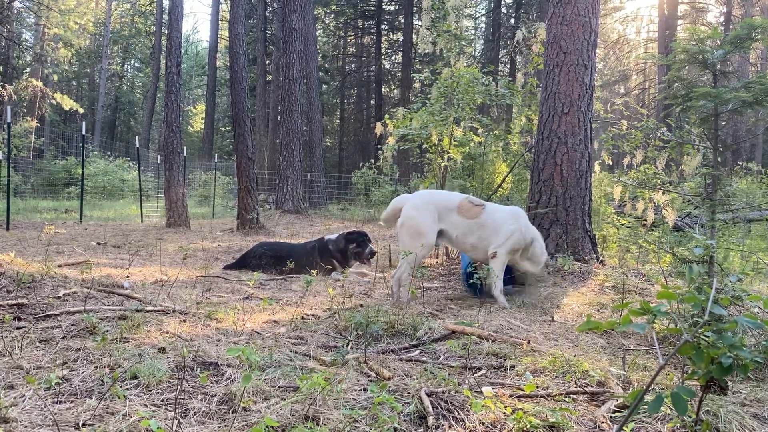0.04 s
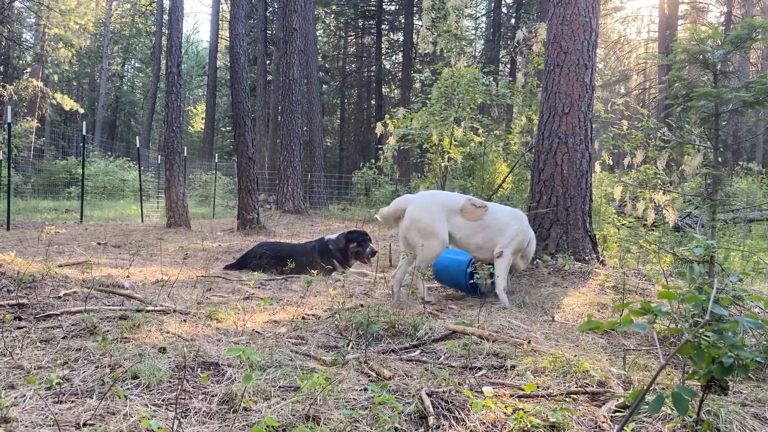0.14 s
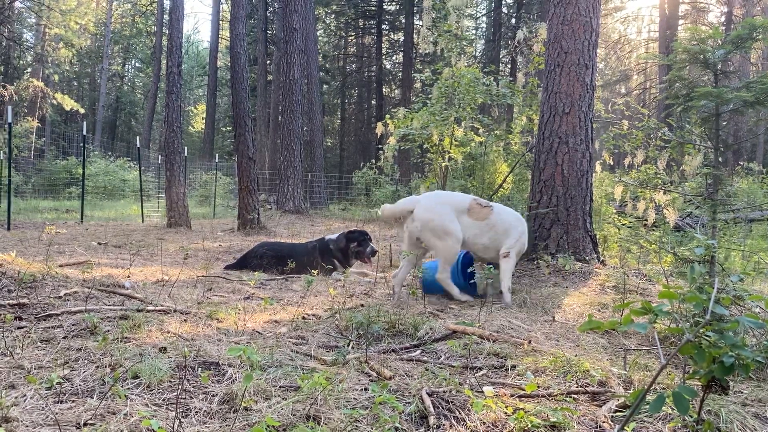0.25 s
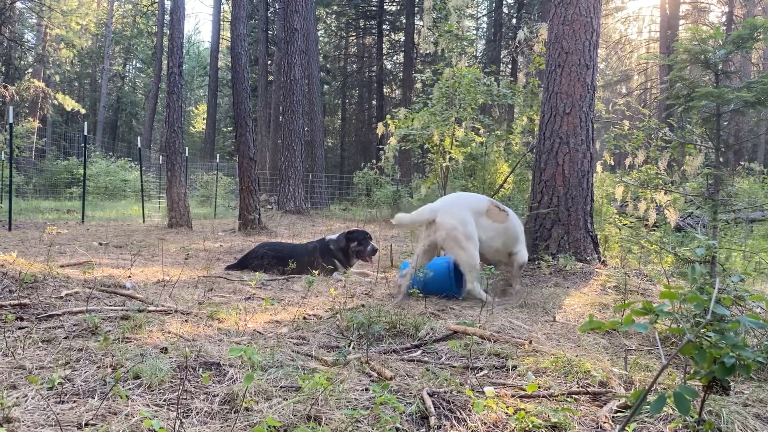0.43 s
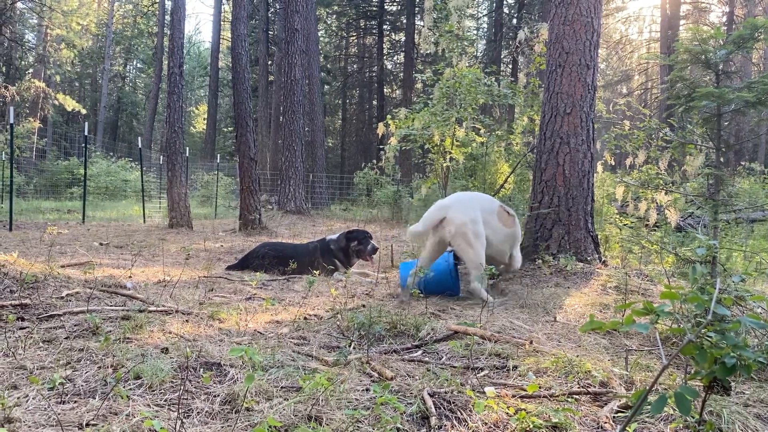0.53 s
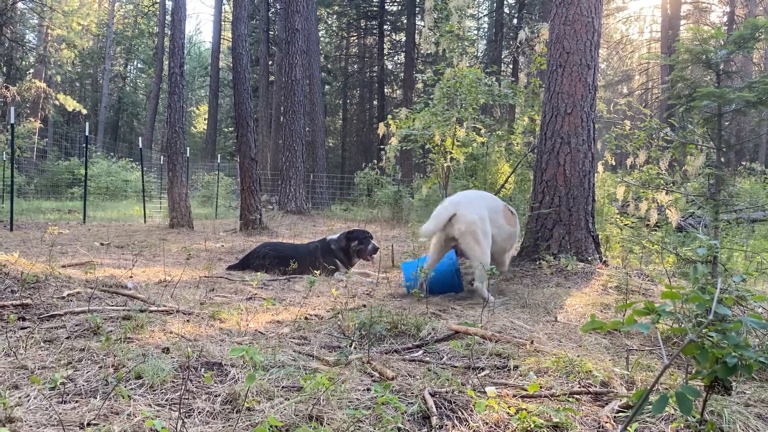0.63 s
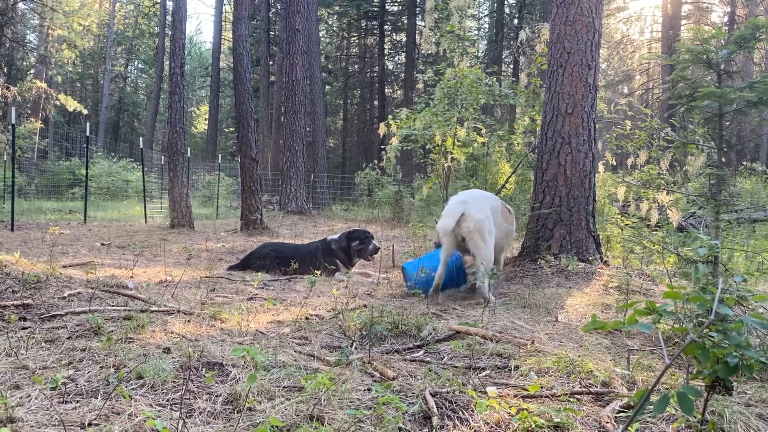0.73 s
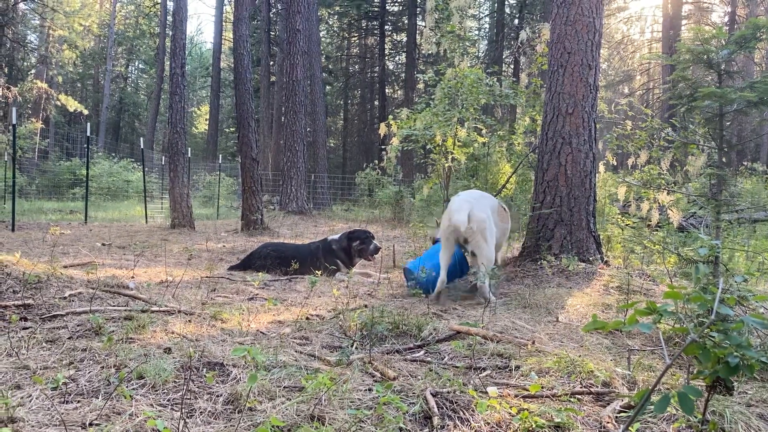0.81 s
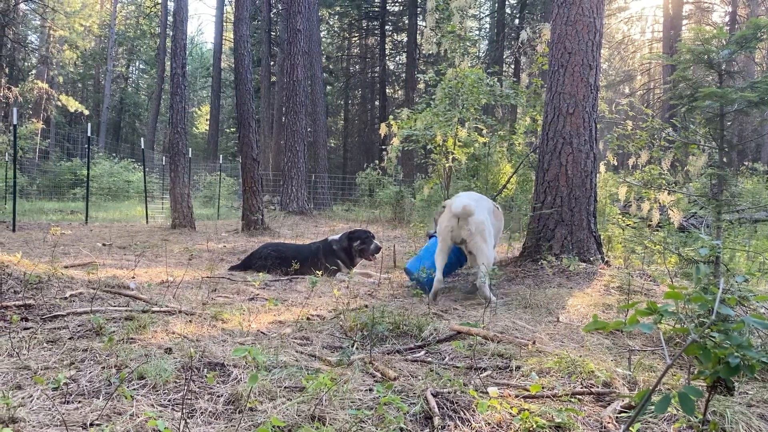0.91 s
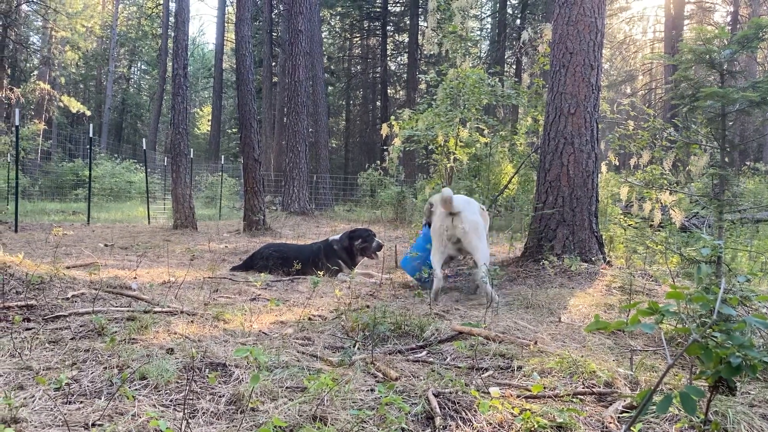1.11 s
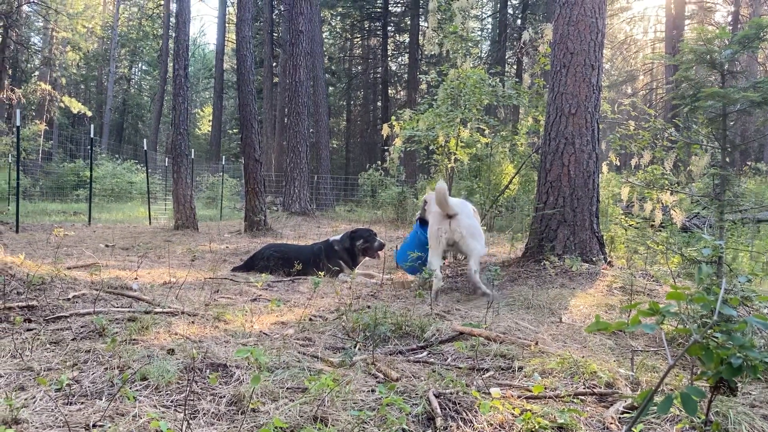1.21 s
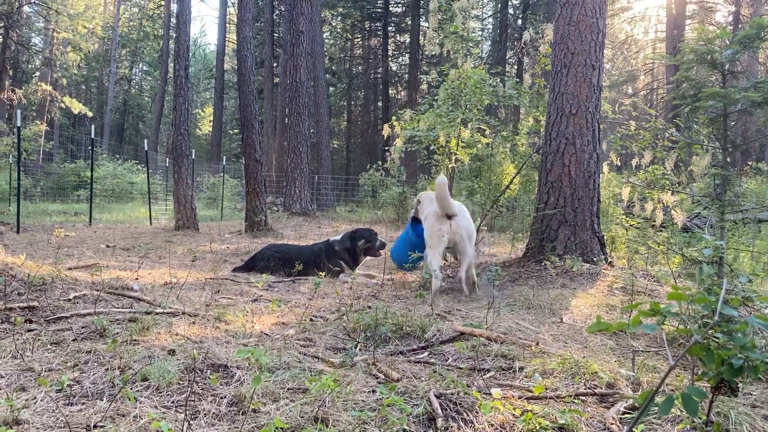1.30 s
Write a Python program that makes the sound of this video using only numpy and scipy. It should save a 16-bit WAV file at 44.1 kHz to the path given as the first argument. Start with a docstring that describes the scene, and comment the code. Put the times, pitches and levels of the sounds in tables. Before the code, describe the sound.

A plastic bucket booms hollowly and clacks as a dog shoves it, then scrapes along the soil in short, softer pushes. Paws scuff dry needles and twigs snap, a few metres from the microphone in a quiet wood.

```python
"""A plastic bucket, shoved by a dog over the needle-covered floor of a wood, a few metres from the mic.
Knocked, the hollow bucket booms; its rim judders, clacks and grinds on the soil and sets the wall ringing.
Around it paws scuff the dry litter and twigs snap. The trunks return a thin echo over a low hush of air.
The stereo microphone's two ports hear the scene with slightly different colour and timing."""
import sys
import numpy as np
from scipy import signal
from scipy.fft import rfft, irfft
from scipy.io import wavfile

SR = 44100
rng = np.random.default_rng(int(sys.argv[2]) if len(sys.argv) > 2 else 0)


def master_out(mix):
    """Clip the mix to full scale and print it as 16-bit PCM to the path in sys.argv[1]."""
    frames = np.transpose(np.atleast_2d(mix))
    ceiling = np.clip(frames, -1, 1)
    pcm = np.round(ceiling * 32767).astype(np.int16)
    wavfile.write(sys.argv[1], SR, pcm)


N = 59535

# knocks on the bucket: t/s, lowest mode f/Hz, boom level/dB, overtone level/dB, overtone rise/s, free ring/s
BUCKET_KNOCKS = [(0.086, 92.2, -43.5, -45.5, 0.01, 0.062), (0.175, 99, -36.5, -41, 0.011, 0.035),
                 (0.1946, 95.1, -24, -31.5, 0.018, 0.074), (0.269, 97.66, -25.5, -20, 0.005, 0.18),
                 (0.36, 101.4, -54, -37, 0.0034, 0.028), (0.408, 102.3, -66, -32.5, 0.0062, 0.05),
                 (0.814, 96.95, -33, -31, 0.015, 0.15), (1.024, 97.4, -72, -51.5, 0.002, 0.0097),
                 (1.115, 96.3, -75, -46.5, 0.0037, 0.06), (1.176, 99.9, -75, -41.5, 0.0066, 0.1)]
# overtones of the bucket: multiple of the lowest mode, level/dB, t60/s
BUCKET_OVERTONES = [(2.0, -5, 0.26), (1.9, -2, 0.033), (2.15, -5, 0.08), (2.6, -11, 0.11),
                    (3.15, -14, 0.04), (4.12, -15.5, 0.24), (4.88, -24, 0.23)]
# shoves along the ground: t/s, rise/s, hold/s, decay/s, rumble level/dB, grind level/dB, rattle level/dB
BUCKET_SHOVES = [(0.067, 0.014, 0.014, 0.011, -63, -43.5, -43.5),
                 (0.111, 0.015, 0.0068, 0.013, -59, -48, -70),
                 (0.173, 0.012, 0.013, 0.01, -47.5, -42, -38.5),
                 (0.198, 0.0062, 0.042, 0.0095, -44.5, -34.5, -32),
                 (0.252, 0.0051, 0.014, 0.033, -36, -36.5, -36.5),
                 (0.347, 0.0093, 0.1, 0.037, -69, -50, -48.5),
                 (0.414, 0.011, 0.011, 0.023, -49.5, -46, -44),
                 (0.45, 0.0084, 0.0074, 0.023, -45, -43, -41),
                 (0.488, 0.0069, 0.047, 0.22, -57, -60.5, -60.5),
                 (0.588, 0.0058, 0.0026, 0.0093, -52.5, -46, -43),
                 (0.659, 0.0077, 0.013, 0.0045, -51.5, -47.5, -48.5),
                 (0.675, 0.026, 0.016, 0.07, -56, -65, -60),
                 (0.797, 0.008, 0.056, 0.029, -52.5, -51, -59.5),
                 (0.879, 0.018, 0.034, 0.0071, -56, -49, -53.5), (1.02, 0.0081, 0.12, 0.022, -56, -53, -56),
                 (1.103, 0.012, 0.04, 0.091, -48.5, -45, -55),
                 (1.155, 0.0053, 0.031, 0.033, -68, -44.5, -50.5)]
# spectra of the hollow's rumble, the rim's grinding and the wall's rattle: f/Hz, level/dB
RUMBLE_SPECTRUM = [(25, -51), (60, 2.5), (125, -8), (200, 2), (300, -2.5), (450, -2.5), (650, -21.5),
                   (2000, -50)]
GRIND_SPECTRUM = [(100, -38), (450, 13), (640, -22), (800, -1.5), (1050, 8.5), (1400, -1), (1700, 11.5),
                  (3000, -3), (15000, -22)]
RATTLE_SPECTRUM = [(100, -85), (1400, -6), (1850, 8), (2250, 11.5), (2500, 4.5), (2850, 8.5), (3400, -13.5),
                   (4100, -4.5), (5300, -23), (15000, -46.5)]
# modes of the plastic wall: f/Hz, level/dB, t60/s
LOW_WALL_MODES = [(798, -4.5, 0.23), (985, -7, 0.092), (1020, -2, 0.065), (1125, -0.5, 0.034),
                  (1261, -3, 0.041), (1348.5, 3.5, 0.028), (1457, -6, 0.043)]
HIGH_WALL_MODES = [(1850, -14, 0.09), (2188, 4.5, 0.06), (2319, 1, 0.097), (2840, -13, 0.066),
                   (2585, 1, 0.17), (2940, 4, 0.14), (4020, -17, 0.3)]
# clacks of the rim on hard ground: t/s, level/dB, centre f/Hz
RIM_CLACKS = [(0.081, -35, 1173), (0.2165, -27, 2360), (0.2385, -30.5, 1196), (0.27, -27.5, 1350),
              (0.456, -44, 990), (0.464, -40.5, 2400), (1.177, -35.5, 1005)]
# paw scuffs: t/s, level/dB, rise/s, decay/s, treble tilt/(dB per octave)
PAW_SCUFFS = [(0.032, -51, 0.001, 0.048, 3.5), (0.161, -42.5, 0.0017, 0.0082, 6.5),
              (0.709, -47.5, 0.0017, 0.014, 7), (0.772, -44, 0.0049, 0.0071, 6)]
# spectrum of litter crushed underfoot: f/Hz, level/dB
SCUFF_SPECTRUM = [(60, 21), (300, -7), (600, -10), (1000, 8), (1600, 9), (2400, 5), (4000, -6.5),
                  (5300, -14), (8000, -23), (15000, -53)]
# twig snaps: t/s, level/dB, centre f/Hz
TWIG_SNAPS = [(0.426, -32, 2200), (0.448, -39, 2700), (0.711, -46, 3900), (0.8485, -35.5, 2900),
              (0.853, -38, 2400), (0.987, -51, 7500), (1.039, -45, 4500), (1.1675, -35, 3200)]
# rustle of dry needles, one list a stride: t/s, level/dB
NEEDLE_STRIDES = [
    [(0.0, -69), (0.242, -77), (0.336, -67), (0.426, -59.5), (0.6, -77)],
    [(0.6, -75), (0.664, -61), (0.982, -71.5), (0.986, -57.5), (1.015, -107)],
    [(1.015, -107), (1.025, -62), (1.111, -67.5), (1.131, -63), (1.35, -63)],
]
# spectrum of that rustle: f/Hz, level/dB
NEEDLE_SPECTRUM = [(60, -3), (600, -6), (1100, 2), (2500, 2), (4000, 1.5), (5300, -1), (7000, 3),
                   (10500, 1.5), (15500, -4.5)]
# colour of the echo off the trunks: f/Hz, gain/dB
ECHO_COLOUR = [(50, -37), (250, -7.5), (800, -1), (8000, 2.5), (15000, -35)]
# spectrum of the still air in the wood: f/Hz, level/dB
AIR_SPECTRUM = [(20, -44), (50, -10), (90, -1.5), (140, -12), (220, -22), (600, -30), (1100, -20.5),
                (2500, -24.5), (5000, -32), (15000, -38)]
# balance of the microphone ports: f/Hz, left minus right/dB
PORT_BALANCE = [(100, -1.5), (350, 0.5), (1290, -1.5), (2380, -8), (4400, -3), (8000, -5.5), (15000, 3.5)]

BOOM_T60_S, BOOM_RISE_S, DAMP_S = 0.63, 0.021, 0.013
JUDDER_DEPTH, JUDDER_KNEE_DB = 0.6, -24  # the judder nears full depth once the boom passes the knee
BUMP_DB = 24.5  # the bump at the bite of a shove, over its slips
GRIND_DB, RATTLE_DB, LOW_RING_GAIN, HIGH_RING_GAIN = -5, -4, 0.81, 0.28
WALL_CUT_HZ = 858  # the wall radiates little below this
CLACK_OCTAVES, CLACK_RISE_S = 0.09, 0.0023
SNAP_DECAY_S, SNAP_DB_PER_OCTAVE = 0.0021, 13
NEEDLE_DB, NEEDLE_WIDTH = 3, 0.58
ECHO_DB, ECHO_T60_S, ECHO_ONSET_S = -7.5, 0.27, 0.0024
AIR_DB, AIR_WIDTH = -60, 0.4
LEFT_LEAD_S, LOW_CUT_HZ, HIGH_CUT_HZ = 22e-6, 35, 15900


def bucket_knock(start, hz, boom_db, overtone_db, rise, free_ring):
    """The hollow bucket booms until ground or muzzle damps it."""
    t = np.maximum(times() - start, 0)
    boom = ringing(t, [(hz, boom_db, BOOM_T60_S)]) * swell(t, BOOM_RISE_S)
    modes = [(ratio * hz, db + overtone_db, t60) for ratio, db, t60 in BUCKET_OVERTONES]
    overtones = ringing(t, modes) * swell(t, rise)
    damping = np.exp(-(np.maximum(t - free_ring, 0) / DAMP_S) ** 2)
    return (boom + overtones) * damping


def rim_scrape(boom):
    """At each shove the rim bumps, then sticks and slips on grit, juddering with the boom."""
    t = times()
    power, bumps = np.zeros((3, N)), np.zeros((3, N))  # rows: rumble, grind, rattle
    for start, rise, hold, decay, *levels_db in BUCKET_SHOVES:
        push = swell(t - start, rise) * np.exp(-np.maximum(t - start - rise - hold, 0) / decay)
        power += np.outer(amp(levels_db), push) ** 2
        bumps[:, round((start + rise) * SR)] += amp(BUMP_DB) * amp(levels_db)
    swing = boom / (abs(signal.hilbert(boom)) + amp(JUDDER_KNEE_DB))
    slips = grains(per_s=4000, spread_db=2) * (1 + JUDDER_DEPTH * swing)
    rumble, grind, rattle = np.sqrt(power) * slips
    _, low_bumps, high_bumps = bumps
    low = body(grind, GRIND_SPECTRUM) + LOW_RING_GAIN * wall(grind + low_bumps, LOW_WALL_MODES)
    high = body(rattle, RATTLE_SPECTRUM) + HIGH_RING_GAIN * wall(rattle + high_bumps, HIGH_WALL_MODES)
    return body(rumble, RUMBLE_SPECTRUM) + amp(GRIND_DB) * low + amp(RATTLE_DB) * high


def rim_clack(start, db, centre_hz):
    """The rim strikes hard ground; the point of contact picks which wall modes ring."""
    t = np.maximum(times() - start, 0)
    modes = []
    for hz, mode_db, t60 in LOW_WALL_MODES + HIGH_WALL_MODES:
        detuning = np.log2(hz / centre_hz) / CLACK_OCTAVES
        modes.append((hz, mode_db - 20 * np.log10(1 + detuning ** 2), t60))
    ring = ringing(t, modes) * swell(t, CLACK_RISE_S)
    return amp(db) * ring / abs(ring).max()


def body(drive, spectrum):
    """The bucket's broad resonances colour the slips of the rim."""
    return through(drive, coloured(signal.unit_impulse(N), spectrum))


def wall(drive, modes):
    """The thin plastic wall rings in its modes, radiating little bass."""
    low_cut = signal.butter(4, WALL_CUT_HZ, "highpass", fs=SR, output="sos")
    return through(drive, signal.sosfilt(low_cut, ringing(times(), modes)))


def paw_scuff(start, db, rise, decay, tilt_db):
    """A paw crushes a clump of litter."""
    t = np.maximum(times() - start, 0)
    crunch = unit_rms(coloured(grains(per_s=3500, spread_db=-1), SCUFF_SPECTRUM, tilt_db))
    envelope = np.minimum(t / rise, 1) * np.exp(-np.maximum(t - rise, 0) / decay)
    return amp(db) * crunch * envelope


def twig_snap(start, db, hz):
    """A twig breaks in a burst a few milliseconds long."""
    t = times() - start
    spectrum = [(hz * 2. ** octave, -SNAP_DB_PER_OCTAVE * abs(octave)) for octave in range(-4, 5)]
    burst = unit_rms(coloured(rng.standard_normal(N), spectrum))
    return amp(db) * burst * (t >= 0) * np.exp(-abs(t) / SNAP_DECAY_S)


def needle_rustle():
    """Dry needles crackle under dog and bucket, a little scattered to either side of the mic."""
    mid, side = (unit_rms(coloured(grains(per_s=1400, spread_db=4), NEEDLE_SPECTRUM)) for _ in range(2))
    level_db = np.interp(times(), *np.vstack(NEEDLE_STRIDES).T)
    return (at_microphone(mid) + NEEDLE_WIDTH * np.array([side, -side])) * amp(NEEDLE_DB + level_db)


def trunk_echo(direct):
    """Scattered echoes from the trunks, as they reach one microphone port."""
    t = times()
    envelope = np.minimum(t / ECHO_ONSET_S, 1) * np.exp(-np.log(1000) * t / ECHO_T60_S)
    reflections = grains(per_s=1700, spread_db=6) * envelope
    return amp(ECHO_DB) * coloured(through(direct, reflections), ECHO_COLOUR)


def still_air():
    """The wood's own ambience, a low steady hush."""
    mid, side = (unit_rms(coloured(rng.standard_normal(N), AIR_SPECTRUM)) for _ in range(2))
    return amp(AIR_DB) * (mid + AIR_WIDTH * np.array([side, -side]))


def at_microphone(direct):
    """Direct sound reaches the left port just ahead of the right, and in a slightly different colour."""
    hz = np.fft.rfftfreq(2 * N, 1 / SR)
    balance = amp(level_at(PORT_BALANCE, hz))
    left = balance * np.exp(2j * np.pi * hz * LEFT_LEAD_S)
    ports = np.array([left, np.ones(N + 1)]) * 2 / (1 + balance)
    return irfft(rfft(direct, 2 * N) * ports)[:, :N]


def amp(db):
    """Decibels to gain."""
    return 10 ** (np.asarray(db) / 20)


def unit_rms(x):
    """Scales to an rms of 1."""
    return x / np.sqrt(np.mean(x ** 2) + 1e-20)


def times():
    """The time of every sample, in seconds."""
    return np.arange(N) / SR


def swell(t, rise):
    """A smooth rise from 0 to 1."""
    return np.sin(np.pi / 2 * np.clip(t / rise, 0, 1)) ** 2


def ringing(t, modes):
    """A sum of decaying sines, one for each mode."""
    return sum(amp(db) * np.exp(-np.log(1000) * t / t60) * np.sin(2 * np.pi * hz * t)
               for hz, db, t60 in modes)


def grains(per_s, spread_db):
    """Random clicks of uneven size."""
    size = amp(spread_db * np.minimum(rng.exponential(1, N), 4))
    return unit_rms(size * rng.choice([-1, 1], N) * (rng.random(N) < per_s / SR))


def level_at(spectrum, hz):
    """A spectrum's level in dB, interpolated on a log-frequency axis."""
    points_hz, db = np.transpose(spectrum)
    return np.interp(np.log(hz + 1), np.log(points_hz + 1), db)


def coloured(x, spectrum, tilt_db=0, size=8192):
    """Minimum-phase filter with the given spectrum, tilted per octave above 500 Hz."""
    hz = abs(np.fft.fftfreq(size, 1 / SR))
    octaves = np.log2(np.maximum(hz, 500) / 2000)
    log_gain = np.log(amp(level_at(spectrum, hz) + tilt_db * octaves))
    response = np.exp(np.conj(signal.hilbert(log_gain)))
    taps = np.fft.ifft(response).real[:size // 2]
    return signal.oaconvolve(x, taps)[:N]


def through(x, response):
    """Convolves with an impulse response scaled to unit energy."""
    return signal.fftconvolve(x, response / np.linalg.norm(response))[:N]


def scene():
    """Bucket and paws a few metres off, with the wood all around the microphone."""
    boom = sum(bucket_knock(*row) for row in BUCKET_KNOCKS)
    bucket = boom + rim_scrape(boom) + sum(rim_clack(*row) for row in RIM_CLACKS)
    paws = sum(paw_scuff(*row) for row in PAW_SCUFFS)
    twigs = sum(twig_snap(*row) for row in TWIG_SNAPS)
    direct = bucket + paws + twigs
    echo = np.array([trunk_echo(direct), trunk_echo(direct)])
    return at_microphone(direct) + echo + needle_rustle() + still_air()


def record(dry):
    """The microphone's low cut and the recorder's band limit."""
    low_cut = signal.butter(2, LOW_CUT_HZ, "highpass", fs=SR, output="sos")
    band_limit = signal.firwin(511, HIGH_CUT_HZ, window=("kaiser", 9), fs=SR)
    return signal.oaconvolve(signal.sosfilt(low_cut, dry), band_limit[None], "same")


dry = scene()
out = record(dry)
master_out(out)
```